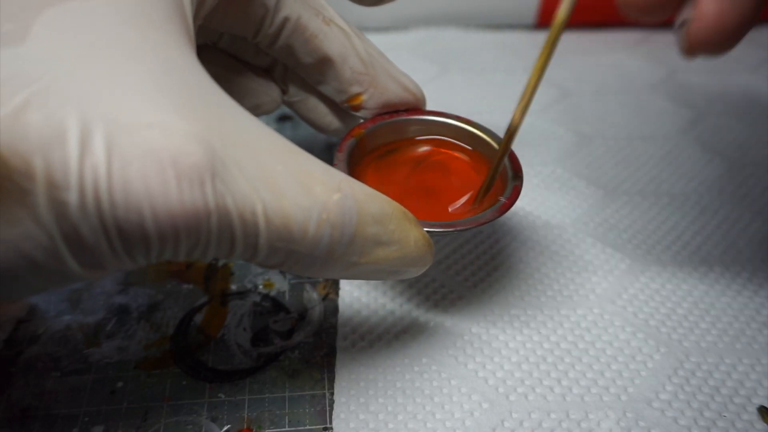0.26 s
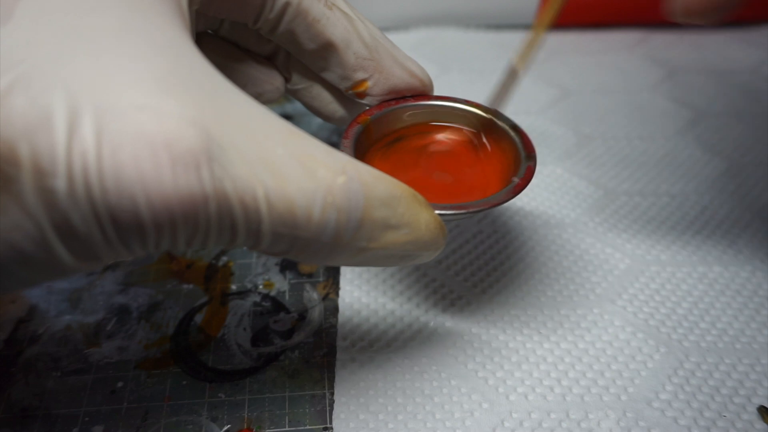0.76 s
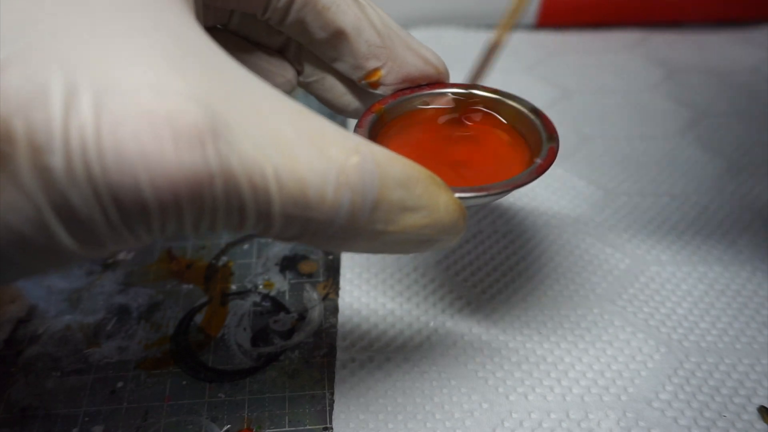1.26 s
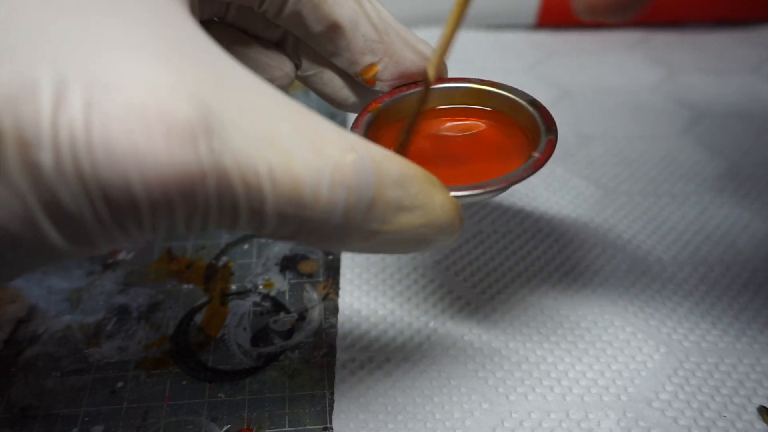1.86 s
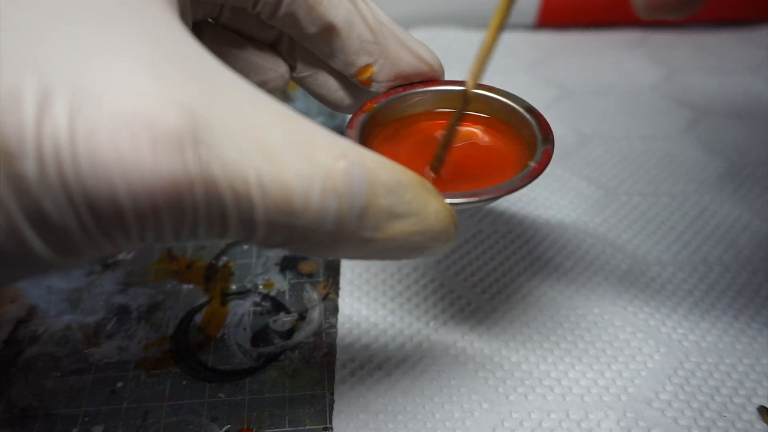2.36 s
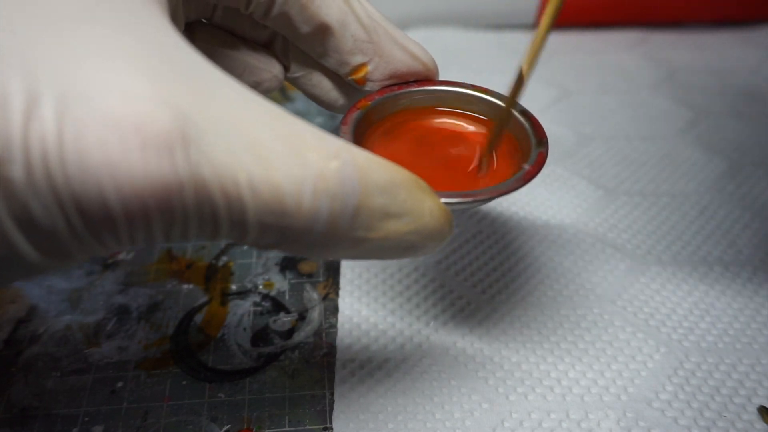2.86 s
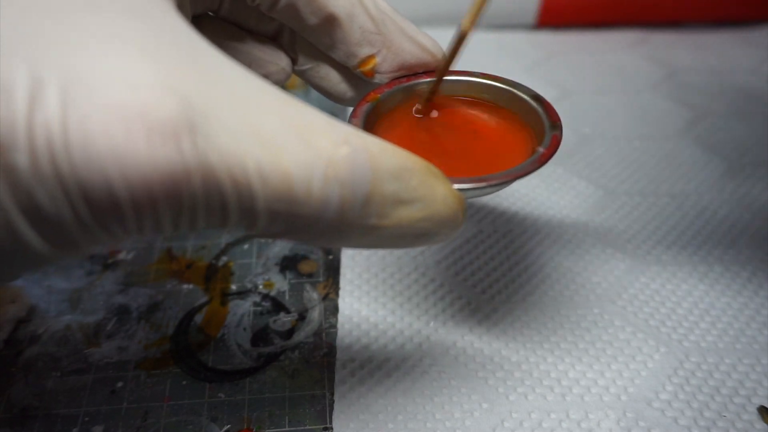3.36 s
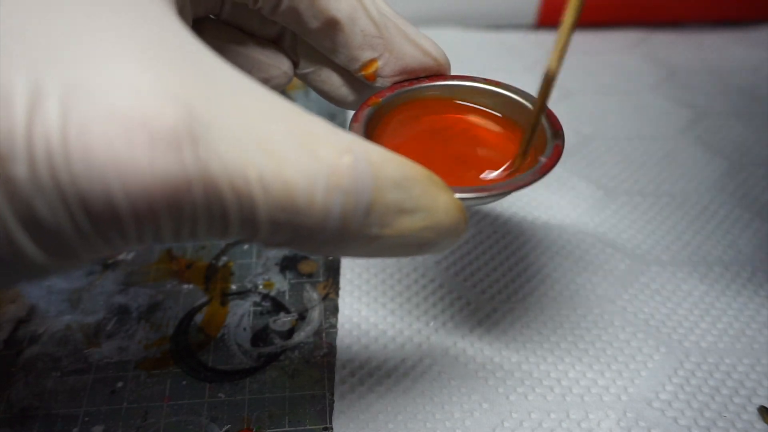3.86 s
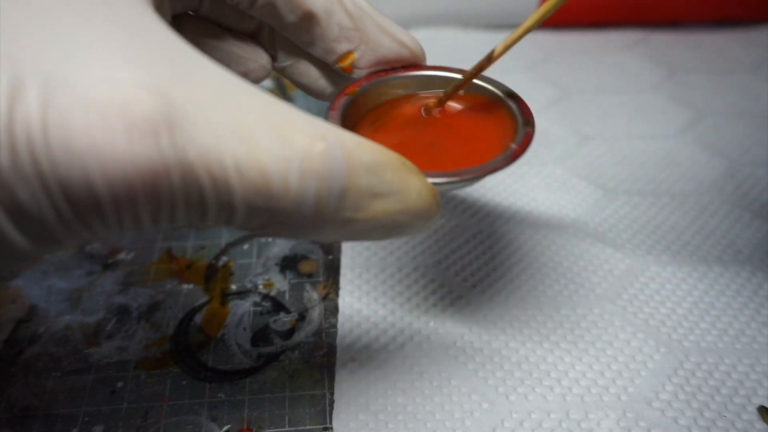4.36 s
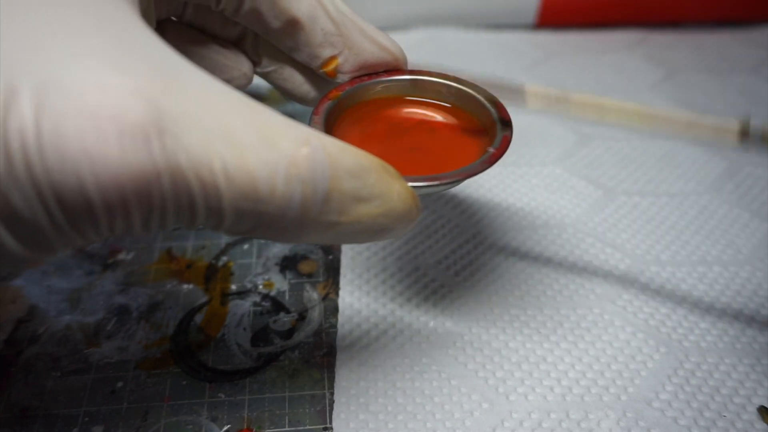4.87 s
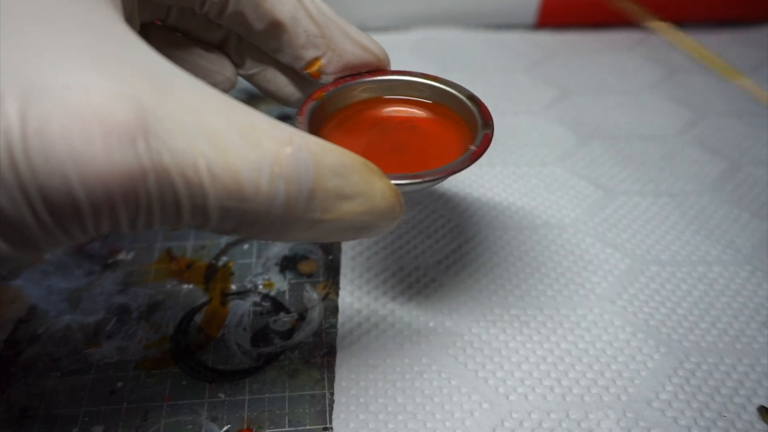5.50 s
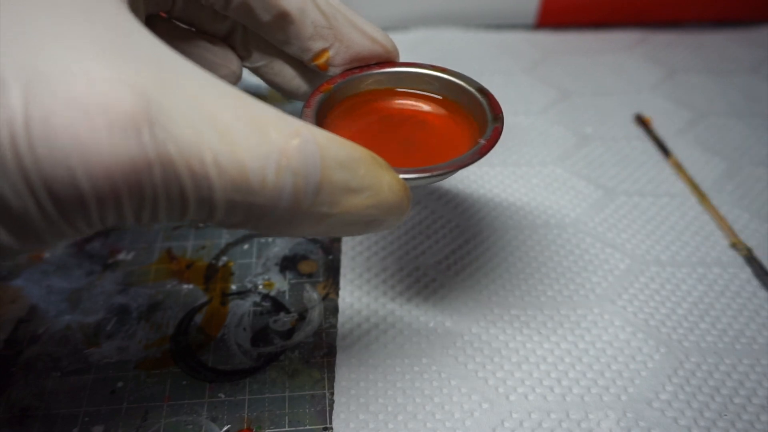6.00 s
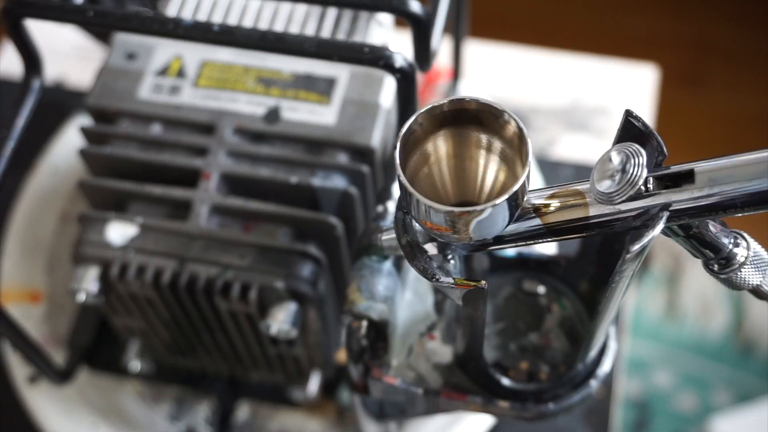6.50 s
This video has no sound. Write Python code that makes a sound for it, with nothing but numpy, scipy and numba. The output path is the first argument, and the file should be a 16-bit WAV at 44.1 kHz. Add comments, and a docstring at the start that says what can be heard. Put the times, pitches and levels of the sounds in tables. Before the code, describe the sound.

Close up in a small room, quick, light strokes of a wooden stick scrape the bottom of a little metal paint dish, ticking and squeaking faintly over a steady fan. After about four seconds the scraping stops, a few knocks follow, and then two sharper taps ring briefly on the rim. Finally the fan's hiss abruptly becomes duller, and a soft rustle rises.

```python
"""A small room, a hand-held metal dish close to a stereo microphone. A thin wooden stick stirs paint in it:
short strokes scrape the dish floor, ringing metal and stick, and the tip catches in tiny squeaks. Then the
stick is knocked off on the rim. A fan hums and hisses behind. Near the end the scene cuts to another
corner of the room, where the hiss is duller and a soft rustle swells."""
import sys
import numpy as np
from scipy import signal
from scipy.fft import rfft, irfft
from scipy.io import wavfile
from scipy.ndimage import uniform_filter1d
from numba import njit

SR = 44100
rng = np.random.default_rng(int(sys.argv[2]) if len(sys.argv) > 2 else 0)


def to_wav(s):
    """Save 16-bit WAV."""
    ch = np.atleast_2d(s).T  # columns
    pcm = np.round(np.clip(ch, -1, 1) * 32767)  # PCM
    wavfile.write(sys.argv[1], SR, pcm.astype(np.int16))


N = 297234
T = np.arange(N) / SR
CUT_S = 6.235  # from the bench to the corner

# Fan hiss at the bench and in the corner, and the rustle. Each row: frequency in Hz, relative dB.
BENCH_HISS = [(25, -27), (50, -12), (80, -20), (130, -11.5), (200, -4), (300, -5.5), (480, -13.5),
              (950, -18.5), (1400, -25), (2400, -25.5), (3600, -29.5), (5600, -15), (7800, -23),
              (9500, -32), (11000, -25.5)]
CORNER_HISS = [(25, -17), (60, -17), (140, -21), (230, 0.5), (350, -11.5), (550, -9), (900, -15.5),
               (1500, -18.5), (3000, -25), (5000, -22.5), (8000, -29), (11000, -33)]
RUSTLE_SPECTRUM = [(300, -14), (550, 3), (750, -2), (1050, -11), (1500, -25), (3500, -15.5), (5000, -18),
                   (8000, -43)]
# Balance at each microphone position. Each row: frequency in Hz, left minus right in dB.
BENCH_PAN = [(60, -0.5), (500, -0.3), (1120, -2.3), (3000, -1), (11600, 0.3)]
CORNER_PAN = [(60, -8), (200, 1), (620, -2.5), (5000, -4.5), (11600, 0.6)]
# How alike the room sounds on both sides. Each row: frequency in Hz, left-right correlation.
CORRELATION = [(60, 0.9), (130, 0.87), (270, 0.92), (570, 0.36), (1210, -0.19), (2570, 0.1), (5450, -0.36),
               (11600, -0.21)]
# The fan's hums. Each row: pitch and width in Hz, level in dB at the bench and in the corner.
FAN_HUMS = [(96.8, 12.4, -69, -63), (155, 10.7, -62.5, -68), (226, 11, -58.5, -80), (935, 34, -74, -83)]
# The rustle's swell. Each row: time in seconds, level in dB.
RUSTLE_SWELL = [(6.5, -93), (6.6, -64), (6.66, -55), (6.74, -56)]
# The nearest hard surfaces. Each row: echo delay in seconds, relative level in dB.
ECHOES = [(0.017, -15), (.029, -19)]
# Modes of the dish by part, damped by fingers and paint. Each row: pitch in Hz, relative level in dB,
# t60 in seconds before the damping factor, phase lead of the left side in radians.
FLOOR_MODES = [(1250, -7, .012, 0.1), (1455, -8, .06, 0.1), (1825, -9, .04, .3), (2580, 0, .045, -.2),
               (2750, -5, .025, .1), (3150, -2, .018, .2), (4070, -3, .03, .2)]
BOWL_MODES = [(5060, -4, .045, .8), (5190, 0, .04, .8), (5350, -6, .025, .8), (5800, -3, .025, 1.2),
              (6300, -8, .02, 1.5)]
WALL_MODES = [(7238, 0, .055, -.1), (7650, -4, .016, -.6), (8080, -11, .018, -.6)]
RIM_MODES = [(8920, -8, .03, .3), (9085, -4, .035, .3), (9220, -1, .04, .3), (9520, -1, .045, .5),
             (9760, -7, .03, .6)]
LIP_MODES = [(10350, 0, .03, 1.1), (10590, -2, .022, 1.3)]
# Catches of the tip. Each row: middle and length in seconds, pitch in Hz, level in dB.
SQUEAKS = [(0.132, 0.011, 7670, -52.5), (0.141, 0.012, 5340, -52.5), (0.158, 0.013, 3500, -50),
           (0.159, 0.01, 10640, -56), (0.175, 0.012, 5200, -52.0), (0.177, 0.01, 7320, -54),
           (0.295, 0.011, 10340, -53), (0.388, 0.013, 3080, -50), (0.393, 0.0072, 7770, -42),
           (0.406, 0.016, 2250, -52), (0.407, 0.017, 10470, -57), (0.419, 0.016, 2920, -53),
           (0.529, 0.011, 10360, -55), (0.623, 0.009, 10700, -55.5), (0.633, 0.01, 7580, -50),
           (0.65, 0.017, 9400, -61), (0.652, 0.013, 7560, -46), (0.754, 0.01, 7290, -51.0),
           (0.755, 0.018, 10300, -56), (0.837, 0.01, 3760, -46), (0.85, 0.008, 7710, -47),
           (0.876, 0.011, 9040, -58), (0.99, 0.021, 7230, -47.5), (1.087, 0.0078, 7520, -43),
           (1.085, 0.012, 9040, -59.0), (1.091, 0.009, 10500, -60.0), (1.213, 0.0092, 7270, -48.5),
           (1.324, 0.011, 10250, -53.5), (1.46, 0.009, 2220, -56), (1.639, 0.0083, 7200, -56),
           (1.833, 0.019, 2505, -49.5), (1.867, 0.024, 2520, -53), (1.872, 0.024, 2580, -59),
           (2.12, 0.011, 7450, -56), (2.243, 0.009, 7280, -52), (2.342, 0.015, 5470, -50.5),
           (2.452, 0.009, 7570, -53), (2.467, 0.017, 2030, -58), (2.763, 0.01, 7920, -56.0),
           (2.781, 0.008, 7430, -54), (2.783, 0.008, 9090, -53), (2.89, 0.014, 7400, -50),
           (2.893, 0.012, 5100, -53.5), (2.96, 0.015, 3710, -54), (3.11, 0.015, 5230, -48.5),
           (3.212, 0.011, 5260, -50.5), (3.32, 0.0092, 3490, -55), (3.321, 0.01, 2390, -53),
           (3.327, 0.016, 7490, -51), (3.726, 0.012, 2860, -48.5), (3.756, 0.009, 2570, -51),
           (3.77, 0.014, 2610, -58), (4.005, 0.018, 5260, -48), (4.015, 0.009, 10420, -53),
           (4.026, 0.007, 2450, -55), (4.159, 0.017, 5140, -56)]
# Stick on dish. Each row: start in seconds; relative dB of click, floor, bowl, wall, rim and lip; # extra crack
# in dB; depth from 0 to 1 of a dip near 3.75 kHz, which also lengthens the crack; # crack's left minus right in
# dB; floor crack's pitch in Hz.
KNOCKS = [(0.0553, -46, -54, -66, -70, -72, -72, -4, .1, -4, 2200),
          (0.192, -36, -49, -60, -62, -68, -68, -6, .1, -4, 3000),
          (0.662, -38, -54, -56, -58, -64, -64, -4, .1, -4, 3600),
          (0.834, -44, -47, -58, -56, -62, -62, 0, .1, -5, 3230),
          (1.58, -38, -44.5, -60, -50, -68, -64, -1.5, 0.2, -5, 2480),
          (3.3665, -30, -62, -51, -60, -68, -66, 1, 0, -2, 2500),
          (3.382, -52, -58, -72, -72, -76, -76, 2, .1, -4, 1800),
          (3.751, -38, -58, -59, -58, -66, -66, -4, .1, -2, 2500),
          (4.025, -42, -48.5, -56, -58, -68, -68, 3.5, .1, -9, 2350),
          (4.329, -44, -55, -70, -70, -76, -76, -4, .1, -6, 2000),
          (4.374, -33, -42.5, -40, -38.5, -62, -41, -10, 0, -6, 1850),
          (4.4639, -36, -43, -38, -39.5, -45, -54, -10.5, 0, -6, 2080),
          (4.585, -34, -48, -40, -51, -53, -56, -7, 0, -2, 2240),
          (4.8899, -18, -31.5, -35.5, -30.5, -28, -27, -4.5, .8, -6.5, 2740),
          (5.117, -50, -52, -67, -66, -60, -68, -4.5, .6, -3, 2500),
          (5.2846, -18, -36, -30.5, -27.5, -26, -33, -3.5, 0.9, -4, 2770),
          (5.818, -36, -60, -56, -60, -70, -70, -8, .1, -6, 2300)]
# Floor, bowl, wall, rim and lip when struck. Each row: crack centre in Hz (None: set by the knock),
# crack width in Hz, crack gain in dB, ring gain in dB.
STRUCK_PARTS = [(None, 1500, 10, -8), (5700, 1100, 12, -13), (7200, 1300, 5, -5), (9330, 700, 12, -11),
                (10600, 900, 3, -11)]
# Where those five parts ring. Each entry: left minus right in dB.
STRUCK_PAN_DB = [-2.5, -6, -5, 9, 4]
# Scraping strokes. Each row: peak and length in seconds; low and high stick ring in Hz;
# relative dB of low ring, high ring, bowl, low wall, high wall, rim and lip.
STROKES = [(0.067, 0.019, 2650, 4160, -50, -50, -66.0, -77.0, -70, -57.5, -71.0),
           (0.165, 0.089, 2240, 3260, -51.5, -48.5, -60, -54, -56, -60, -66),
           (0.298, 0.043, 2470, 3600, -49, -53.5, -70, -51, -63, -59, -63),
           (0.395, 0.058, 2370, 3500, -48, -43, -57, -52, -45, -57.0, -56),
           (0.536, 0.095, 2350, 3080, -56.5, -57, -78, -57, -66, -70, -65),
           (0.646, 0.053, 2350, 3570, -53, -51.5, -60, -49, -51, -58, -64.0),
           (0.76, 0.069, 2180, 2780, -53, -53, -68, -55, -62, -68, -62),
           (0.86, 0.065, 2270, 3700, -52.5, -48.5, -72, -52, -47, -61.0, -59),
           (0.948, 0.033, 2360, 2980, -59, -50.5, -73, -65, -66, -70.0, -68.0),
           (0.985, 0.064, 2040, 3040, -55, -59, -63, -51, -59, -64, -65.0),
           (1.085, 0.042, 2200, 3170, -60.0, -53.5, -55, -51, -48.0, -59, -57),
           (1.2, 0.06, 2330, 3880, -51.5, -56, -68, -57.5, -69, -71.0, -68.0),
           (1.326, 0.059, 2360, 2840, -57, -72, -70, -53, -62.0, -65, -60),
           (1.373, 0.086, 2640, 3850, -63.0, -70, -61.0, -62, -66.0, -69, -65),
           (1.46, 0.053, 2280, 3460, -52.5, -60, -71, -59, -71, -61, -66),
           (1.57, 0.13, 2380, 2840, -59, -70, -67.5, -62.5, -71, -70, -64),
           (1.64, 0.056, 2660, 3970, -65, -54.5, -63, -60, -65, -59, -68),
           (1.751, 0.054, 2750, 3950, -61, -56.0, -64, -64, -69, -58, -67.0),
           (1.867, 0.14, 2450, 2940, -53, -51.5, -59.5, -63, -63, -65, -69),
           (1.99, 0.031, 2600, 3550, -48, -59, -59, -62.0, -72, -63, -64),
           (2.105, 0.1, 2250, 2880, -58.5, -60, -61.5, -59, -61.0, -61, -70),
           (2.24, 0.032, 1750, 2800, -51.5, -57, -52, -53, -55, -68, -70.0),
           (2.341, 0.089, 2180, 3170, -56, -64, -62, -56.5, -59, -58, -65),
           (2.459, 0.049, 2080, 2970, -48, -48.5, -60, -57, -55.0, -61, -64),
           (2.583, 0.057, 2120, 3530, -57.5, -73, -61, -53.5, -57, -58, -73),
           (2.675, 0.059, 2030, 3320, -52.5, -54, -61, -55, -61, -69, -61),
           (2.771, 0.068, 2170, 3470, -53, -55.5, -65, -55, -55, -57.5, -64),
           (2.889, 0.088, 1920, 2860, -52.5, -51.5, -59, -59, -57, -64, -74),
           (2.974, 0.076, 2100, 3400, -49.5, -56.5, -58.5, -54.5, -53.5, -63, -70.0),
           (3.098, 0.1, 1900, 2870, -51.5, -52, -61, -57, -60, -63, -71),
           (3.196, 0.075, 2170, 3420, -48.5, -54.5, -66, -54, -51.5, -64, -71.0),
           (3.326, 0.048, 2200, 3320, -47.5, -51.5, -58.0, -55, -47, -62, -64),
           (3.455, 0.15, 2440, 2940, -56.5, -64, -62.0, -63, -59, -64.5, -64),
           (3.622, 0.056, 2580, 3800, -53.5, -60, -62.5, -63.5, -71.0, -63.0, -76),
           (3.737, 0.19, 2440, 2930, -51.5, -55, -58.5, -61, -61, -61.5, -64),
           (3.902, 0.043, 2640, 3600, -47, -56, -61, -68, -68.0, -63, -64.0),
           (4.017, 0.18, 2280, 2960, -56.5, -59, -57.5, -58, -57, -62, -68),
           (4.168, 0.066, 1950, 2900, -54.5, -65, -57.5, -56, -66, -64.5, -76)]
# The tip drags on lightly between strokes. Each row: time in seconds, relative level in dB.
TIP_DRAG = [(0, -66), (.6, -61.5), (1.2, -63.5), (1.7, -60), (2.2, -60.5), (2.8, -68), (3.4, -67),
            (3.8, -64.5), (4.15, -62.5), (4.25, -75)]
# A loose grip narrows the stick's rings. Each row: time in seconds, width of the low ring in Hz.
GRIP_WIDTH = [(0, 636), (1.6, 640), (2.1, 480), (2.8, 400), (3.1, 393), (3.35, 500), (3.65, 800),
              (4.2, 610)]
# Bowl, low wall, high wall, rim and lip when scraped.
# Each row: drag offset in dB, gain in dB, damping factor, left minus right in dB.
SCRAPED_PARTS = [(-30, -20, 1, -6), (-11, -20, 2.5, -6.5), (-15, -17.5, 1.4, -1), (-12.5, -22, 1.67, 3.5),
                 (-9, -20.5, 1.25, 2.5)]


def undb(db):
    """Decibels to amplitude."""
    return 10 ** (np.asarray(db, float) / 20)


def unit(x):
    """Scale to an RMS of 1."""
    return x / np.sqrt(np.mean(x ** 2))


def pan(db):
    """Stereo gains that put the left db above the right."""
    return undb([[db / 2], [-db / 2]])


def on_log(table, hz):
    """Rows of (Hz, value) read on a log-frequency axis."""
    points_hz, values = np.transpose(table)
    return np.interp(np.log(hz + 1), np.log(points_hz), values)


def smooth(x, samples):
    """Two passes of a moving average."""
    return uniform_filter1d(uniform_filter1d(x, samples), samples)


def walk(per_s):
    """Smooth random drift with a spread near 1."""
    hold = int(SR / per_s)
    return 1.7 * smooth(np.repeat(rng.standard_normal(N // hold + 1), hold), hold)[:N]


@njit
def moving_band(x, hz, width_hz):
    """Band-pass whose centre and width may move every sample."""
    out, band, low = np.empty(len(x)), 0., 0.
    for i in range(len(x)):
        g, loss = np.tan(np.pi * hz[i] / SR), width_hz[i] / hz[i]
        v = (band + g * (x[i] - low)) / (1 + g * (g + loss))
        band, low, out[i] = 2 * v - band, low + 2 * g * v, loss * v
    return out


def steady_band(x, hz, width_hz):
    """The same band-pass held still."""
    return moving_band(x, np.full(len(x), float(hz)), np.full(len(x), float(width_hz)))


def room_noise(spectrum, balance):
    """Noise of a given spectrum and balance, most alike on both sides in the bass."""
    hz = np.arange(N // 2 + 1) * SR / N
    alike = on_log(CORRELATION, hz)
    mid, side = rfft(rng.standard_normal((2, N))) * np.sqrt([1 + alike, 1 - alike])
    db, lean_db = on_log(spectrum, hz), on_log(balance, hz) / 2
    left, right = (mid + side) * undb(db + lean_db), (mid - side) * undb(db - lean_db)
    return unit(irfft(np.array([left, right]), N))


def fan():
    """A fan's hiss and wavering hums, heard at the bench and then from the corner."""
    in_corner = np.clip((T - CUT_S) / 0.0064, 0, 1)
    out = (1 - in_corner) * room_noise(BENCH_HISS, BENCH_PAN) * undb(-52 + .5 * walk(1.15))
    out += in_corner * room_noise(CORNER_HISS, CORNER_PAN) * undb(-54)
    for hz, width_hz, bench_db, corner_db in FAN_HUMS:
        hum = unit(steady_band(rng.standard_normal(N), hz, width_hz))
        out += hum * undb(bench_db + in_corner * (corner_db - bench_db) + 1.33 * walk(1.72))
    return out


def rustle():
    """A soft, fluttering rustle swells in the corner at the very end."""
    swell_db = np.interp(T, *np.transpose(RUSTLE_SWELL))
    return room_noise(RUSTLE_SPECTRUM, CORNER_PAN) * undb(swell_db + 1.7 * walk(40)) * (T > CUT_S)


def small_room(direct, t60=.28, gap_s=.004, echo_hz=(8800, 9900)):
    """Near surfaces return smeared, bright echoes to the microphone over a short, thin tail."""
    t = np.arange(int(.3 * SR)) / SR
    tail, echo = rng.standard_normal((2, 2, len(t)))
    tail *= undb(-12.5 - 60 * t / t60) * (t > gap_s) * np.sqrt(14 / t60 / SR)
    echo *= sum(undb(db - 16.5) * np.exp(-((t - delay) / 0.0012) ** 2) for delay, db in ECHOES)
    echo = signal.sosfilt(signal.butter(2, echo_hz, "band", fs=SR, output="sos"), echo)
    return direct + signal.fftconvolve(direct, tail + echo, axes=1)[:, :N]


def squeaks(width_hz=260, roughness=0.55, sag=0.016, spread=0.29):
    """The tip catches and one ring flares: a rough tone that swells, sags in pitch and dies."""
    out, half = np.zeros((2, N)), 1300
    t = np.arange(-half, half) / SR
    noises = rng.standard_normal((len(SQUEAKS), 6, len(t)))
    for (middle_s, length, hz, db), noise in zip(SQUEAKS, noises):
        wobble = unit(smooth(noise, int(SR / width_hz / 2)))
        mid = 1 + roughness * (wobble[0] + 1j * wobble[1])
        sides = spread * (wobble[2:4] + 1j * wobble[4:])
        carrier = np.exp(2j * np.pi * hz * (t - sag * t ** 2 / length / 2) + 3j * noise[0, 0])
        tone = ((mid + sides) * carrier).real * undb(db - 20 * (t / length) ** 2)
        at = int(middle_s * SR)
        out[:, at - half:at + half] += tone * pan(-5.5)
    return out


def dish_ring(force, modes, pan_db, damping, patchy_db=0):
    """Decaying modes, each with its own phase left and right; a moving contact drives them patchily."""
    out = np.zeros((2, N))
    for hz, db, t60, lead in modes:
        drive = force * undb(db + (patchy_db * walk(55) if patchy_db else 0))
        pole = np.exp((2j * np.pi * hz - np.log(1000) * damping / t60) / SR)
        mode = signal.lfilter([1], [1, -pole], drive)
        out += [(mode * np.exp(.5j * lead)).imag, (mode * np.exp(-.5j * lead)).imag]
    return out * pan(pan_db)


def knocks(crack_s=0.0007, rim_crack_s=0.0021, click_s=0.0003):
    """Wood strikes metal: a click, a short crack (longer on the rim), then the dish rings."""
    out, forces = np.zeros((2, N)), np.zeros((5, N))
    t = np.arange(int(.03 * SR)) / SR
    blow = t == 0
    noises = rng.standard_normal((len(KNOCKS), 8, len(t)))
    click_band = signal.butter(3, [1900, 10500], "band", fs=SR, output="sos")
    ring_db = [part[-1] for part in STRUCK_PARTS]
    for (start, click_db, *parts_db, extra_db, dip, pan_db, floor_hz), noise in zip(KNOCKS, noises):
        click = signal.sosfilt(click_band, (noise[0] + 3 * blow) * np.exp(-t / click_s))
        attack = undb(click_db - 6) * click / np.abs(click).max() * np.ones((2, 1))
        fade = np.exp(-(t / (crack_s + dip * rim_crack_s)) ** 2)
        for (hz, width, crack_db, _), part_db, part_noise in zip(STRUCK_PARTS, parts_db, noise[2:]):
            burst = (part_noise + 1.4 * noise[:2]) * fade + 20 * blow
            hz = hz or floor_hz
            crack = np.array([steady_band(steady_band(side, hz, width), hz, 2 * width) for side in burst])
            attack += crack / np.abs(crack).max() * undb(part_db + crack_db + extra_db)
        at = int(start * SR)
        out[:, at:at + len(t)] += attack * pan(pan_db)
        forces[:, at] = np.sign(noise[7, :5]) * undb(np.add(parts_db, ring_db))
    parts = FLOOR_MODES, BOWL_MODES, WALL_MODES, RIM_MODES, LIP_MODES
    for force, modes, pan_db in zip(forces, parts, STRUCK_PAN_DB):
        out += dish_ring(force, modes, pan_db, damping=.95)
    # A dip near 3.75 kHz colours the knocks, deeper after some knocks than others.
    starts, *_, dip_depth, _, _ = np.transpose(KNOCKS)
    latest = np.maximum(np.searchsorted(starts, T) - 1, 0)
    return out - dip_depth[latest] * np.array([steady_band(side, hz=3750, width_hz=900) for side in out])


def grit(per_s, spread_db):
    """Slips of the tip over the metal: dense clicks of uneven size."""
    size = undb(spread_db * np.minimum(rng.exponential(size=N), 3.2)) * rng.standard_normal(N)
    return unit(size * (rng.random(N) < per_s / SR))


def pressure(strokes_db, drag_db, edge_db=13.5, rise_share=0.6, squareness=3.3):
    """The hand's pressure: each stroke swells, holds and lets go over the light drag."""
    power = undb(np.interp(T, *np.transpose(TIP_DRAG), right=-150) + drag_db) ** 2
    for (peak_s, length, *_), db in zip(STROKES, strokes_db):
        near = slice(max(int((peak_s - 2 * length) * SR), 0), int((peak_s + 2 * length) * SR))
        offset = (T[near] - peak_s) / length
        to_edge = np.abs(offset / np.where(offset < 0, rise_share, 1 - rise_share))
        power[near] += undb(db - edge_db * to_edge ** squareness) ** 2
    return np.sqrt(power)


def scrape():
    """Grit under the tip rings the dish in brief patches, rings the bending stick and hisses."""
    peaks_s, _, low_hz, high_hz, low_db, high_db, *parts_db = np.transpose(STROKES)
    slips = grit(7000, 1.8) * undb(1.1 * walk(110))  # the tip skips
    out, antiphase = np.zeros((2, N)), np.array([[1], [-1]])
    parts = BOWL_MODES, WALL_MODES[:1], WALL_MODES[1:], RIM_MODES, LIP_MODES
    for modes, part_db, (drag_db, gain_db, damping, pan_db) in zip(parts, parts_db, SCRAPED_PARTS):
        patches = unit(undb(3.2 * walk(70)))
        force = slips * patches * pressure(part_db, drag_db)
        out += dish_ring(force, modes, pan_db, damping, patchy_db=2) * undb(gain_db)
    # Each stroke's angle tunes the stick's two rings; the grip sets their width.
    stroke = np.searchsorted((peaks_s[1:] + peaks_s[:-1]) / 2, T)
    grip_hz = np.interp(T, *np.transpose(GRIP_WIDTH))
    for ring_hz, ring_db, width in ((low_hz, low_db, grip_hz), (high_hz, high_db, 1.4 * grip_hz)):
        hz = uniform_filter1d(ring_hz[stroke], size=400) * (1 + 0.028 * walk(60))
        mid, side = (unit(moving_band(moving_band(drive, hz, width), hz, 2.2 * width))
                     for drive in (slips, grit(6000, 2.3)))
        gain = pressure(ring_db - 5.5, drag_db=-17.5) * undb(1.83 * walk(70))
        out += gain * pan(-3.6) * (mid + 0.39 * side * antiphase)
    hiss_band = signal.butter(2, [1700, 7000], "band", fs=SR, output="sos")
    mid, side = signal.sosfilt(hiss_band, [slips, grit(5000, 0.95)])
    return out + undb(-11) * pressure(high_db, drag_db=16.3) * pan(-3) * (mid + side * antiphase)


def scene():
    """Stick and dish up close in the small room, fan and rustle behind."""
    return small_room(scrape() + squeaks() + knocks()) + fan() + rustle()


def record(dry, top_hz=10990):
    """A steep low-pass removes the treble above about 11 kHz."""
    return signal.sosfilt(signal.ellip(14, .5, 66, top_hz, fs=SR, output="sos"), dry)


dry = scene()
out = record(dry)
to_wav(out)
```